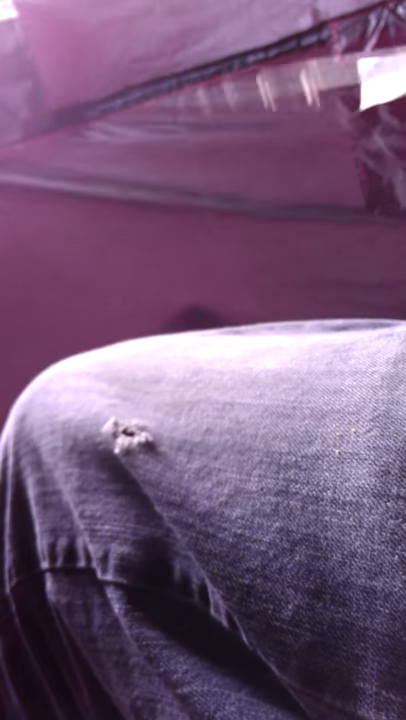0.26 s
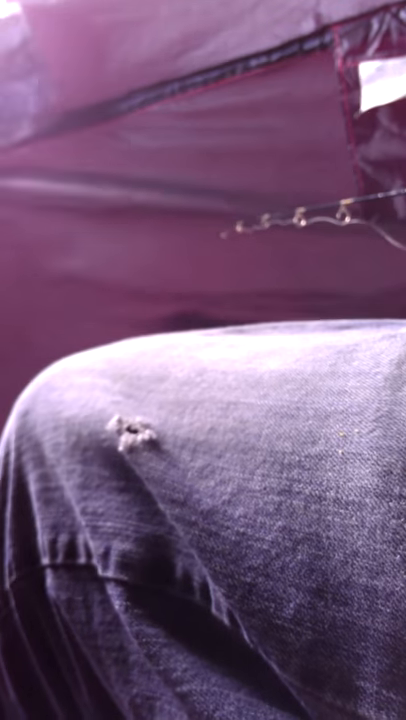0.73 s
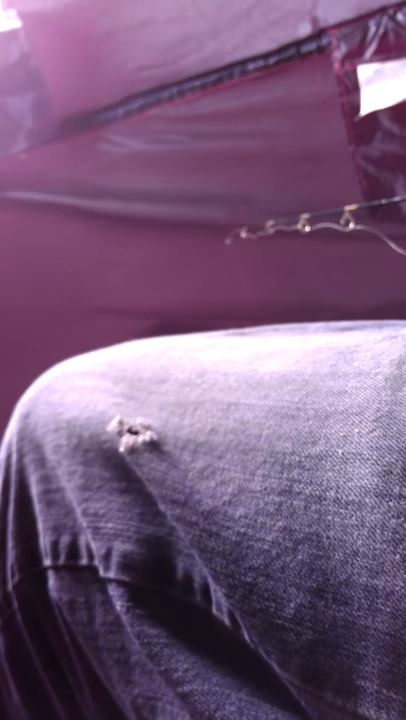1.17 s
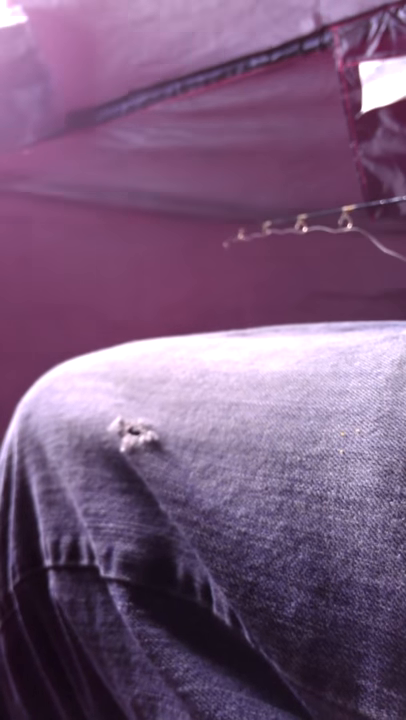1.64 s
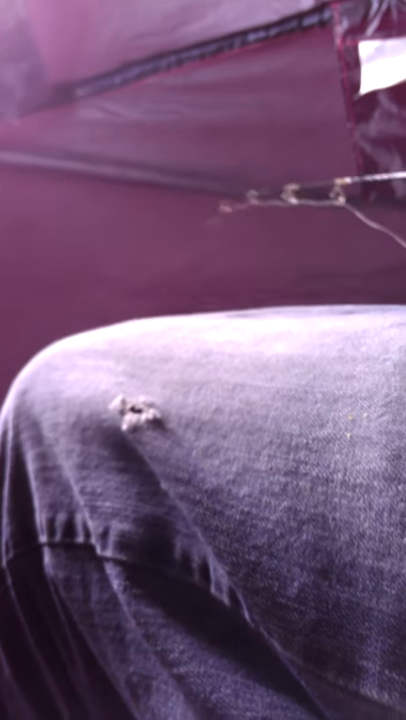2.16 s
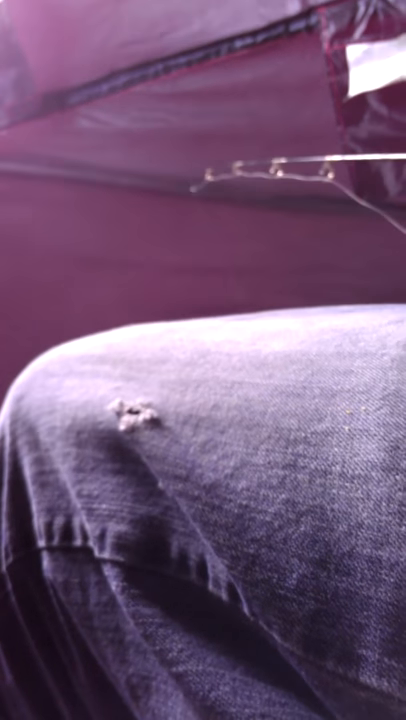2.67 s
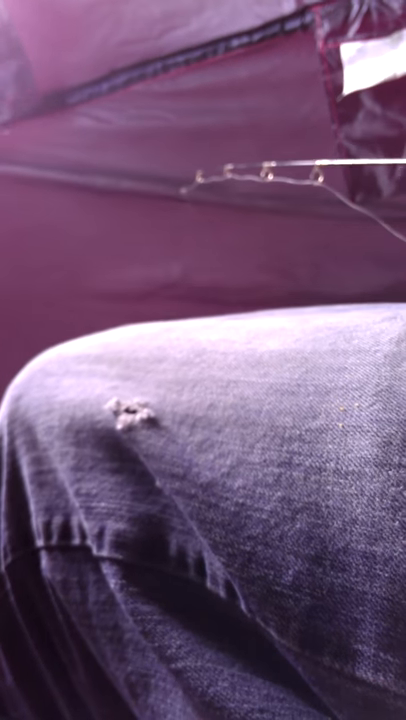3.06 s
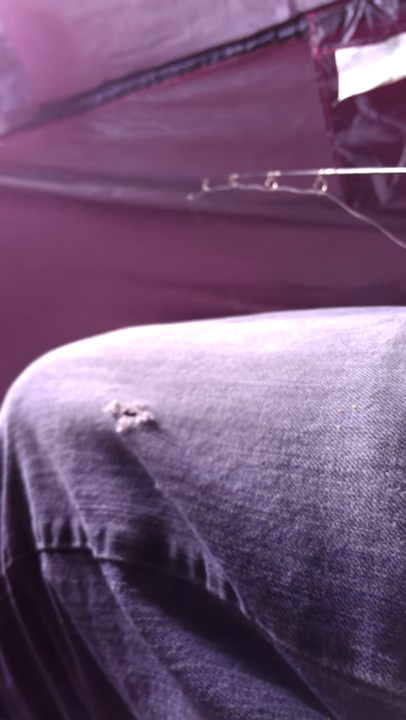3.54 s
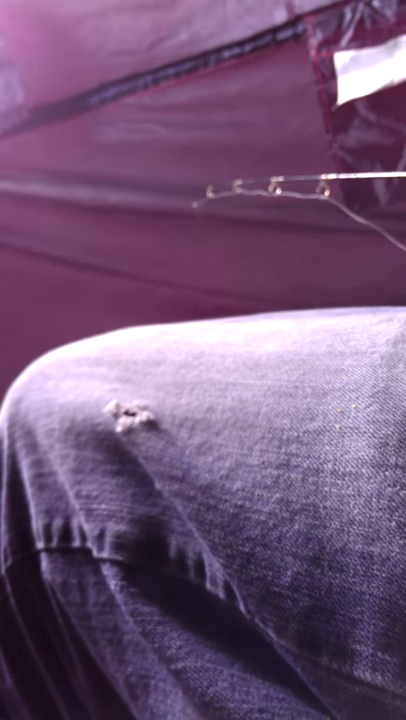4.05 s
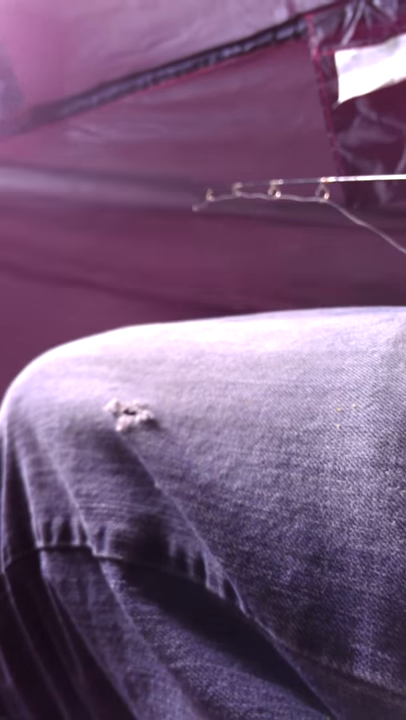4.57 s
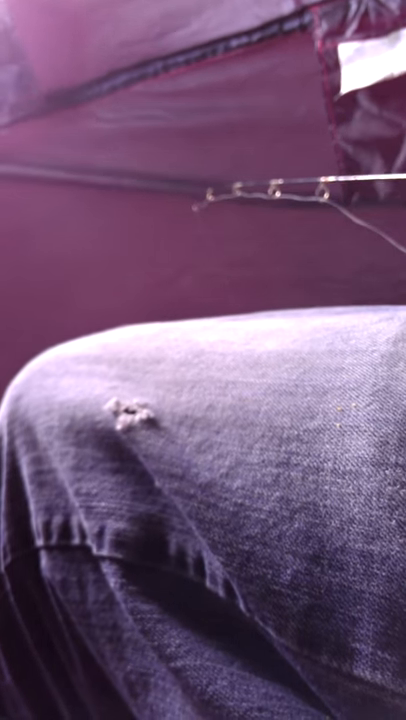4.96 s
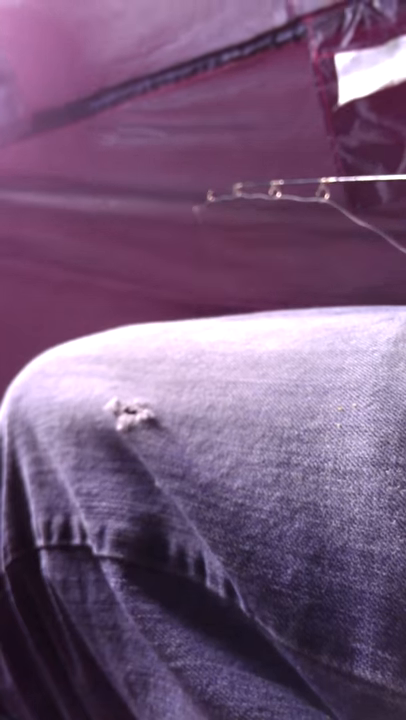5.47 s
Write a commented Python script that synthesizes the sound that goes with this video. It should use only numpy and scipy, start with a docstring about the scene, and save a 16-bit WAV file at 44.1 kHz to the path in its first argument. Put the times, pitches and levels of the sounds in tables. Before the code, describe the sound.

Thin tent walls billow and flap in strong wind, heard from within by a phone. Nearly continuous bassy buffeting carries papery flutter, short cracks and brief hissing swishes of snow for almost three seconds, peaking in a bright cluster of snaps. The wind then drops, leaving quieter rustle, a solitary thump, small flaps and snaps, and very faint thin whistles of sliding weave. The space is tight and dry, with soft wind outside.

```python
"""One hears cloth walls billow, flutter, thump and snap in strong wind, with a hiss of fine snow.
The place is a small fabric shelter on the ice. Shaped noise and pulses follow the wind and its buffets;
gliding sines make the thumps, filtered bursts the snaps, and noise-modulated sines the whistles of the weave.
A phone in the shelter picks it up, widens the stereo image and cuts the top."""
import sys
import numpy as np
from scipy import signal
from scipy.fft import rfft, irfft, next_fast_len
from scipy.io import wavfile
from scipy.ndimage import uniform_filter1d, map_coordinates

SR = 44100
rng = np.random.default_rng(int(sys.argv[2]) if len(sys.argv) > 2 else 0)


def materialize(psi):
    """Save the field psi as 16-bit PCM at rate SR to the path in sys.argv[1].

    A 1-D psi becomes a single channel; in a 2-D psi each row is a channel.
    """
    bounded = np.clip(np.atleast_2d(psi).T, -1, 1)
    quanta = np.round(bounded * 32767).astype(np.int16)
    wavfile.write(sys.argv[1], SR, quanta)


N = 251811

# Wind strength between buffets. Each row: time in seconds, strength in dB (scaled by the GROWTH settings).
WIND = [(0.0, 3.5), (0.23, -3.5), (0.53, 3), (0.76, 2.5), (1.06, 0), (1.37, 1.5), (1.69, -1.5),
        (1.99, -0.5), (2.22, 3.5), (2.5, 0.5), (2.7, 5), (2.88, -6.5), (3.1, -9), (3.58, -12), (4.3, -3.5),
        (4.88, -6.5), (5.2, -6), (5.71, -0.5)]
# Level at wind 0 dB, and dB gained per dB of wind.
HEAVE_DB, HEAVE_GROWTH = -53.5, 0.78
FLUTTER_DB, FLUTTER_GROWTH = -62.5, 0.85
SLIDE_DB, SLIDE_GROWTH = -62, 1.23

# A buffet hits a wall: it heaves, flutters and slides with a swish. Each row: crest in seconds, rise time
# in seconds, heave in dB, flutter in dB, swish in dB, swish lag in seconds (negative leads). Before lulls.
BUFFETS = [(0.037, 0.08, -41.5, -49, -55, 0.02), (0.296, 0.029, -42, -56.5, -59, 0.0054),
           (0.385, 0.031, -40, -49.5, -53.5, 0.0077), (0.531, 0.055, -41, -46, -54, -0.0056),
           (0.625, 0.066, -43.5, -53, -45, -0.011), (0.84, 0.045, -40.5, -47.5, -46, 0.043),
           (0.95, 0.064, -33, -52.5, -40.5, -0.0065), (1.03, 0.043, -42, -51.5, -56, -0.0019),
           (1.121, 0.059, -40.5, -51.5, -57.5, 0.086), (1.243, .033, -38.5, -50.5, -44, 0.073),
           (1.45, 0.054, -41, -54, -49, -0.015), (1.591, 0.042, -41.5, -46.5, -53, -0.012),
           (1.744, 0.038, -32.5, -46, -47, .024), (1.885, 0.03, -43.5, -56, -52, 0.029),
           (2.054, 0.023, -43.5, -48.5, -57, .005), (2.16, 0.091, -40, -44.5, -55, -0.051),
           (2.26, 0.05, -36.5, -41, -55.5, 0.0069), (2.324, .025, -39, -42.5, -45, 0.0069),
           (2.405, .035, -45, -49.5, -70, -0.015), (2.59, 0.044, -43.5, -43, -62, 0.025),
           (2.666, 0.019, -38.5, -37.5, -46.5, 0.025), (2.77, 0.044, -43.5, -51.5, -52, -0.012),
           (2.969, .05, -50, -55, -63, -0.011), (3.19, 0.025, -52.5, -71, -75, 0.0018),
           (3.344, 0.025, -37.5, -52.5, -57.5, 0.0069), (3.68, 0.039, -48.5, -62, -60, 0.017),
           (3.82, 0.032, -53.5, -63.5, -62, -0.0021), (3.96, 0.05, -50.5, -59.5, -63, -.01),
           (4.075, 0.044, -45, -53, -60, -.015), (4.155, 0.034, -45.5, -55, -65, 0.0013),
           (4.287, 0.043, -40, -46, -61.5, 0.037), (4.41, 0.027, -47.5, -52.5, -57.5, -0.00039),
           (4.493, 0.037, -38, -49, -44, .038), (4.65, 0.021, -67, -57, -62.5, 0.075),
           (4.787, 0.017, -51.5, -47, -59, 0.018), (5.0, 0.055, -52.5, -54, -62, -0.007),
           (5.083, 0.021, -44.5, -53, -59, 0.021), (5.215, 0.065, -40, -50.5, -55, 0.011),
           (5.298, 0.032, -44, -58, -55.5, -0.00099), (5.43, 0.023, -65, -59, -61, .02),
           (5.6, 0.055, -53.5, -53.5, -52.5, -0.018), (5.675, 0.047, -47.5, -57, -61, 0.0086)]
FALL_PER_RISE, ROUNDNESS = 1.26, 1.34  # ratio of times; crest exponent (1 pointed, 2 round)
SWISH_RISE_S, SWISH_FALL_S = 0.032, 0.03  # at the usual rise time
USUAL_RISE_S, SWISH_STRETCH = 0.036, 0.23  # slower buffets slide for longer, by this power

# Pressure drops and walls hang limp. Each row: centre in seconds, depth in dB before LULL_BITE.
LULLS = [(0.24, 5), (0.455, 5.5), (1.375, 7), (1.995, 6), (2.495, 7), (2.875, 6), (3.12, 3), (3.56, 1),
         (4.875, 9.5)]
LULL_HALF_S = 0.031
# Multipliers of the lull depth, for heave, flutter and slide in turn [no unit].
LULL_BITE = [1.2, 0.66, 0.43]

# A wall fills with air. Each row: start in seconds, level in dB before trim, first pitch in Hz,
# last pitch in Hz, swell time in seconds, side (left +1 to right -1).
FLAPS = [(0.367, -30, 107, 70, 0.0081, -0.42), (0.592, -34.5, 79, 69.5, 0.028, -0.15),
         (0.812, -27, 70, 55, 0.011, -0.34), (0.920, -19, 136, 71, 0.0066, -0.09),
         (1.702, -24, 149, 91.5, 0.0047, -0.16), (1.724, -16, 134.6, 62.4, 0.011, -.1),
         (2.039, -27.5, 86, 59, 0.0043, -0.3), (2.248, -22.5, 171, 111, 0.0044, -.1),
         (2.649, -28.5, 113, 72, 0.017, -0.58), (2.758, -29, 136, 76, 0.0024, -.2),
         (3.322, -23, 156, 44, 0.01, 0.02), (4.067, -33, 148, 107, 0.0051, -0.3),
         (4.226, -31, 110, 70.5, 0.0094, 0), (4.288, -36, 90, 65, 0.0062, 0),
         (4.469, -29.5, 147, 113, 0.0048, 0), (4.493, -32, 172, 75, 0.0079, -0.06),
         (5.076, -37, 113, 69.5, 0.0073, -0.094), (5.15, -37, 80, 46, 0.016, .1)]
FLAP_TRIM_DB = -4.0

# Cloth jerks taut. Each row: start in seconds, level in dB before trim, bright edge in Hz
# (the filter edge is at least 600 Hz).
SNAPS = [(0.083, -36, 1720), (0.277, -57, 895), (0.389, -32, 674), (0.498, -39, 1100), (0.570, -35.5, 2000),
         (0.926, -29, 575), (1.039, -36, 1100), (1.128, -41.5, 4500), (1.219, -42, 1700),
         (1.527, -36, 1210), (1.647, -35, 930), (1.726, -29, 733), (2.038, -34.5, 2850),
         (2.094, -37.5, 3500), (2.12, -35, 860), (2.323, -32.5, 2020), (2.531, -38, 905),
         (2.574, -27, 1310), (2.599, -25.5, 2160), (2.6634, -21.5, 2510), (2.764, -29.5, 1150),
         (2.929, -41.5, 1020), (3.171, -47, 1010), (3.339, -35, 1730), (3.807, -40.5, 920),
         (4.071, -36, 970), (4.379, -41, 900), (4.774, -39.5, 3200), (5.016, -43.5, 1300),
         (5.197, -41.5, 990), (5.62, -38.5, 3280), (5.644, -36, 3400)]
SNAP_TRIM_DB = -15.5
# Length at this edge; brighter snaps are shorter by this power.
SNAP_S, SNAP_EDGE_HZ, SNAP_SHORTENS = 0.041, 1070, 0.41

# A loose fold crumples. Each row: crest in seconds, rise time in seconds, crinkle level in dB.
CRUMPLES = [(1.04, 0.025, -56), (2.09, 0.08, -55), (2.435, 0.013, -56), (2.603, 0.015, -51.5),
            (3.345, 0.019, -56.5), (4.505, .03, -50), (5.65, 0.037, -51.5)]
# Crinkle level at the reference flutter, its growth in dB per dB, and its level relative to the slide.
CRINKLE_REF_DB, CRINKLE_DB, CRINKLE_GROWTH, SLIDE_CRINKLE_DB = -50, -61, 0.83, -13.5

# The weave whistles as it slides. Each row: centre in seconds, half-length in seconds (to 1/e),
# pitch at the centre in Hz, level in dB before trim.
ZIPS = [(0.461, 0.11, 2960, -64.5), (0.46, 0.095, 5190, -57.5), (0.675, 0.04, 4970, -61),
        (1.916, 0.034, 5300, -55), (4.148, 0.015, 6600, -63), (4.411, 0.018, 6700, -60.5),
        (5.204, 0.0094, 6670, -54), (5.45, .05, 6570, -65), (5.578, 0.028, 5050, -55.5)]
ZIP_TRIM_DB = 4

# Spectrum of the heaving walls. Each row: frequency in Hz, relative density in dB per Hz.
HEAVE_SPECTRUM = [(13, -46), (22, -53), (40, -2.5), (65, 1), (135, -5), (330, -19.5), (430, -36),
                  (730, -120)]
# Spectrum of the dull cloth flutter. Each row: frequency in Hz, relative density in dB per Hz.
CLOTH_SPECTRUM = [(110, -9), (220, -0.5), (340, -5.5), (490, 0), (660, -1), (900, -1.5), (1060, -6),
                  (1300, -16.5), (2000, -15.5), (4000, -56)]
# Spectrum of the crinkling creases. Each row: frequency in Hz, relative density in dB per Hz.
CREASE_SPECTRUM = [(600, 0.5), (1250, -2), (1700, -1), (2100, -2.5), (2700, 0), (3600, -6.5), (4500, -8),
                   (6000, -14), (10000, -41)]
# Spectrum of the snow hiss. Each row: frequency in Hz, relative density in dB per Hz.
HISS_SPECTRUM = [(1800, -15.5), (3600, -11), (4500, -4.5), (5230, -0.5), (5900, -3.5), (7000, -7),
                 (8500, -10.5), (10500, -13.5), (14000, -19)]
# Spectrum of the wind outside. Each row: frequency in Hz, relative density in dB per Hz.
FAR_WIND_SPECTRUM = [(20, -36), (38, -17), (60, 4.5), (95, -3), (250, -2.5), (360, -13.5), (850, -17),
                     (1350, -31), (3700, -29.5), (5300, -34), (7200, -31.5), (14000, -33)]
# Sound arriving from all around. Each row: frequency in Hz, side level in dB against mid.
DIFFUSE = [(45, -2.5), (70, -9), (130, -17.5), (300, -31), (1000, -23), (2000, -9), (5000, -7),
           (12000, -2.5)]
# Stereo widening by the phone. Each row: frequency in Hz, gain in dB before the bass cut.
WIDENING = [(300, -7.5), (1500, -5), (5000, -7), (12000, -11)]
TOP_HZ = 14100


def billow(level_db):
    """The heaving walls pump the air in the shelter: low noise that dips ahead of each flap."""
    heave = steady(coloured(rng.standard_normal((2, N)), HEAVE_SPECTRUM), seconds=0.094)
    return amp(level_db + slack(FLAPS, lead_s=0.016, depth_db=2)) * heave


def flaps(glide_s=0.015, overtone=0.18, sway=0.83):
    """A wall fills: a few swings whose pitch glides as the bulge spreads over the panel."""
    t, out = np.arange(SR // 4) / SR, np.zeros((2, N))
    for start_s, db, first_hz, last_hz, swell_s, side in FLAPS:
        pitch_hz = last_hz + (first_hz - last_hz) * np.exp(-t / glide_s)
        phase = 2 * np.pi * np.cumsum(pitch_hz) / SR
        shape = t / swell_s * np.exp(1 - t / swell_s)
        swing = -np.sin(phase) + overtone * np.sin(2.325 * phase + rng.uniform(0, 2 * np.pi))
        # air sloshes from side to side, a quarter cycle behind
        slosh = sway * (1 - np.exp(-t / 0.019)) * np.cos(phase)
        add(out, start_s, amp(db + FLAP_TRIM_DB) * shape * np.array([swing, side * swing + slosh]))
    return out


def ripples(flutter_db, crinkle_db):
    """Ripples beat through the cloth: dull pats, and finer crinkles on the same beats."""
    beat = wobble(60)
    dull = pats(rate=520, centre_hz=702.5, cycles=3.4, spread_db=9)
    dull = dull + 0.75 * ticks(rate=900, spread_db=5.0)
    fine = pats(rate=700, centre_hz=2207, cycles=13.5, spread_db=14.5)
    fine = fine + 1.34 * ticks(rate=700, spread_db=2) + patchy(depth_db=6)
    flutter = amp(flutter_db + 1.5 * beat) * steady(coloured(dull, CLOTH_SPECTRUM), seconds=0.039)
    crinkle = amp(crinkle_db + 2.36 * beat) * steady(coloured(fine, CREASE_SPECTRUM), seconds=0.045)
    return flutter + crinkle


def snaps(low_hz=330, rattle=0.36, spiky=0.75):
    """A sharp pressure step, then a brief rattle of folds; tighter cloth sounds brighter and thinner."""
    t, out = np.arange(SR // 8) / SR, np.zeros((2, N))
    for start_s, db, edge_hz in SNAPS:
        length_s = SNAP_S * (SNAP_EDGE_HZ / edge_hz) ** SNAP_SHORTENS
        spikes = np.exp(spiky * rng.standard_normal(len(t)))
        folds = unit(rng.standard_normal((2, len(t))) * spikes)
        burst = rattle * folds * amp(-30 * t / length_s) * [[1], [.3]]
        burst[0] += 0.88 * np.exp(-t / 0.00057)  # pressure step, mid only
        top_hz = np.clip(edge_hz, 600, SR / 3)
        bottom_hz = min(max(low_hz, top_hz / 5), top_hz / 2)
        band = signal.butter(3, [bottom_hz, top_hz], "band", fs=SR, output="sos")
        crack = signal.sosfilt(band, burst)
        loudness = np.sqrt(np.sum(crack[0] ** 2) / (length_s * SR / 2))
        add(out, start_s, amp(db + SNAP_TRIM_DB) * crack / loudness)
    return out


def sweep(level_db):
    """Countless grains skim the taut cloth in short swishes; the finest fizz wavers slightly."""
    grains = patchy(depth_db=3.0) + 0.58 * ticks(rate=2200, spread_db=9)
    hiss = coloured(walls(grains), HISS_SPECTRUM)
    fizz = filtered(hiss, lambda hz: hz ** 6 / (hz ** 6 + 8500. ** 6))
    fizz_change = amp(0.43 * wobble(24)) - 1
    return amp(level_db + 2.12 * wobble(55)) * (hiss + fizz_change * fizz)


def zips(width_hz=150, slowing_per_s=.45):
    """Sliding over the regular weave gives a fuzzy whistle that sinks as the slide slows."""
    t, out = np.arange(N) / SR, np.zeros((2, N))
    for centre_s, length_s, hz, db in ZIPS:
        phase = 2 * np.pi * np.cumsum(hz * np.exp(-slowing_per_s * (t - centre_s))) / SR
        fuzz = unit(filtered(rng.standard_normal((2, N)), lambda f: 1 / (1 + (f / width_hz) ** 2)))
        shape = np.exp(-((t - centre_s) / length_s) ** 2)
        out += amp(db + ZIP_TRIM_DB) * shape * fuzz * np.sin(phase) * [[1], [.35]]
    return out


def far_wind():
    """The rush of wind over the ice outside: noise whose level and colour drift."""
    return amp(-60.5 + 0.67 * wobble(2.86)) * coloured(patchy(depth_db=6.0), FAR_WIND_SPECTRUM)


def motion():
    """Heave, flutter and slide in dB: powers of the wind and every buffet add up, then lulls cut them."""
    wind_s, strength_db = np.transpose(WIND)
    wind_db = np.interp(np.arange(N) / SR, wind_s, strength_db)
    heave = amp(HEAVE_DB + HEAVE_GROWTH * wind_db) ** 2
    flutter = amp(FLUTTER_DB + FLUTTER_GROWTH * wind_db) ** 2
    slide = amp(SLIDE_DB + SLIDE_GROWTH * wind_db) ** 2
    for crest_s, rise_s, heave_db, flutter_db, swish_db, lag_s in BUFFETS:
        push = swell(crest_s, rise_s, FALL_PER_RISE * rise_s)
        heave += (amp(heave_db) * push) ** 2
        flutter += (amp(flutter_db) * push) ** 2
        stretch = (rise_s / USUAL_RISE_S) ** SWISH_STRETCH
        swish = swell(crest_s + lag_s, stretch * SWISH_RISE_S, stretch * SWISH_FALL_S)
        slide += (amp(swish_db) * swish) ** 2
    limp_db = sum(depth_db * swell(s, LULL_HALF_S, LULL_HALF_S) for s, depth_db in LULLS)
    return 10 * np.log10([heave, flutter, slide]) - np.outer(LULL_BITE, limp_db)


def creasing(flutter_db, slide_db):
    """Crinkle level in dB: powers from flutter, sliding and crumpling folds add up."""
    shaken = amp(CRINKLE_DB + CRINKLE_GROWTH * (flutter_db - CRINKLE_REF_DB))
    slid = amp(slide_db + SLIDE_CRINKLE_DB)
    crumpled = sum((amp(db) * swell(s, rise_s, FALL_PER_RISE * rise_s)) ** 2 for s, rise_s, db in CRUMPLES)
    return 10 * np.log10(shaken ** 2 + slid ** 2 + crumpled)


def swell(crest_s, rise_s, fall_s):
    """A rounded rise to 1 at the crest and a fall after it."""
    t = np.arange(N) / SR - crest_s
    near = np.abs(t) < 6 * max(rise_s, fall_s)
    out = np.zeros(N)
    out[near] = np.exp(-np.abs(t[near] / np.where(t[near] < 0, rise_s, fall_s)) ** ROUNDNESS)
    return out


def slack(events, lead_s, depth_db):
    """Just before it pulls tight the cloth flies free and is quieter: a dip in dB ahead of each event."""
    t = np.arange(N) / SR
    dips = [np.exp(-((t - s) / lead_s) ** 2) * np.clip((s - t) / 0.0061, 0, 1) for s, *_ in events]
    return -depth_db * np.max(dips, axis=0)


def pats(rate, centre_hz, cycles, spread_db):
    """Small patches of cloth flip over, rate a second; each rings for a few cycles at its own pitch."""
    t, out = np.arange(SR // 30) / SR, np.zeros((2, N))
    for when, pitch, size, turn in rng.random((int(rate * N / SR), 4)):
        hz = centre_hz * 2 ** (3 * pitch - 1.5)  # within 1.5 octaves either way
        tone = np.sin(2 * np.pi * (hz * t + [[turn], [turn + pitch]]))
        add(out, when * N / SR, amp(spread_db * size) * tone * np.exp(-hz * t / cycles))
    return unit(out)


def ticks(rate, spread_db):
    """Two trains of random one-sample impulses of uneven size, rate a second."""
    hit = rng.random((2, N)) < rate / SR
    sign = np.sign(rng.standard_normal((2, N)))
    size = amp(spread_db * np.clip(rng.standard_normal((2, N)), -2, 2))
    return unit(hit * sign * size)


def patchy(depth_db):
    """Two noises whose colour drifts in shared patches of time and frequency."""
    z = signal.stft(rng.standard_normal((2, N)), nperseg=512)[2]
    field = uniform_filter1d(rng.standard_normal(z.shape[1:]), size=6, axis=0)
    field = uniform_filter1d(field, size=9, axis=1)
    return signal.istft(z * amp(depth_db * unit(field)), nperseg=512)[1][:, :N]


def walls(x, bounce=0.1, count=6):
    """The close walls return a few weak reflections within milliseconds."""
    lags_s = rng.uniform(.002, .012, (count, 2, 1))
    reflected = filtered(x, lambda hz: 1 + bounce * np.exp(-2j * np.pi * hz * lags_s).sum(axis=0))
    return reflected / np.sqrt(1 + count * bounce ** 2)


def coloured(pair, spectrum):
    """Mid and side with the given spectrum and diffuse share; the mid has rms 1."""
    def response(hz):
        mid_side = np.array([np.ones_like(hz), amp(along(DIFFUSE, hz))])
        return amp(along(spectrum, hz)) * mid_side
    out = filtered(pair, response)
    return out / np.std(out[0])


def steady(pair, seconds):
    """Even out the slow chance swells of a noise by the running power of its mid."""
    window = signal.windows.hann(max(int(seconds * SR), 8))
    power = signal.fftconvolve(pair[0] ** 2, window / window.sum(), "same")
    return pair / np.sqrt(np.abs(power) + 0.052)


def wobble(rate):
    """A smooth random curve, rate knots a second."""
    knots = rng.standard_normal(int(N * rate / SR) + 4)
    return map_coordinates(knots, [np.arange(N) * rate / SR])


def filtered(x, response):
    """x times a complex response of frequency."""
    m = next_fast_len(N + SR // 2)
    return irfft(rfft(x, m) * response(np.fft.rfftfreq(m, 1 / SR)), m)[..., :N]


def along(points, hz):
    """(Hz, value) points read on a log frequency axis."""
    f, v = np.transpose(points)
    return np.interp(np.log(hz + 1), np.log(f + 1), v)


def add(track, start_s, sound):
    """Mix a sound into a track from its start time."""
    part = track[..., max(round(start_s * SR), 0):][..., :sound.shape[-1]]
    part += sound[..., :part.shape[-1]]


def amp(db):
    """Decibels to gain."""
    return 10 ** (np.asarray(db) / 20)


def unit(x):
    """Scale to rms 1."""
    return x / np.sqrt(np.mean(x ** 2) + 1e-20)


def scene():
    """All sources as mid and side, turned into left and right."""
    heave_db, flutter_db, slide_db = motion()
    crinkle_db = creasing(flutter_db, slide_db)
    cloth = billow(heave_db) + flaps() + ripples(flutter_db, crinkle_db) + snaps()
    mid, side = cloth + sweep(slide_db) + zips() + far_wind()
    return np.array([mid + side, mid - side])


def record(dry, corner_hz=150, delay_s=.00162):
    """The phone feeds a delayed, bass-cut copy of the mid to the side, and cuts the top."""
    def widen(hz):
        highpass = (1j * hz) ** 2 / (corner_hz ** 2 + np.sqrt(2) * 1j * hz * corner_hz - hz ** 2)
        return amp(along(WIDENING, hz)) * highpass * np.exp(-2j * np.pi * hz * delay_s)
    echo = filtered(dry.mean(axis=0), widen)
    return filtered(dry + np.array([echo, -echo]), lambda hz: hz < TOP_HZ)


dry = scene()
out = record(dry)
materialize(out)
```